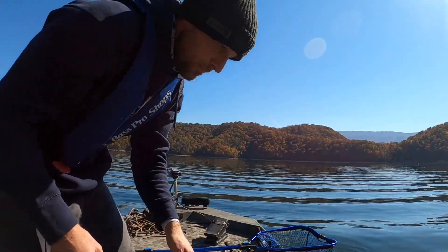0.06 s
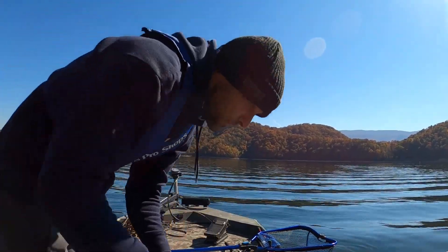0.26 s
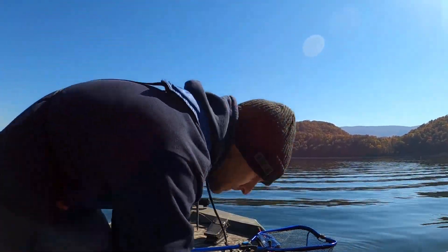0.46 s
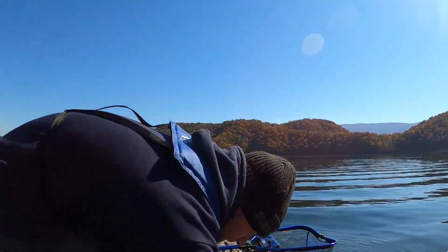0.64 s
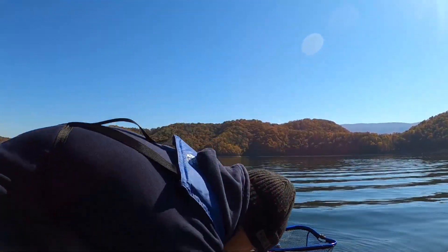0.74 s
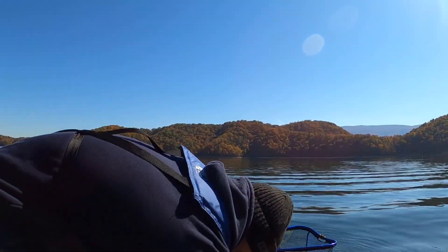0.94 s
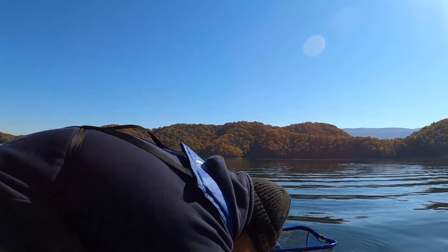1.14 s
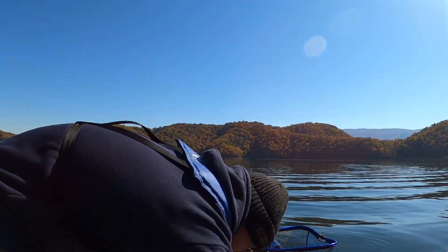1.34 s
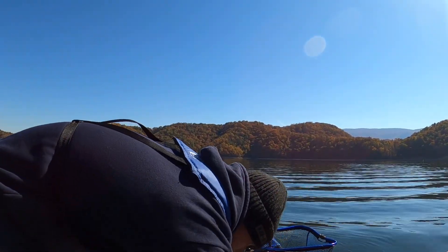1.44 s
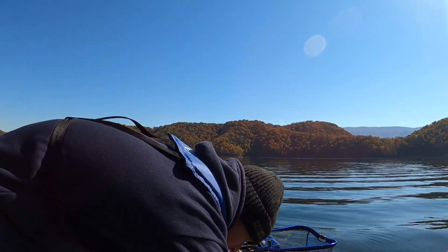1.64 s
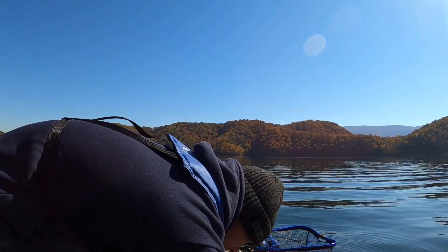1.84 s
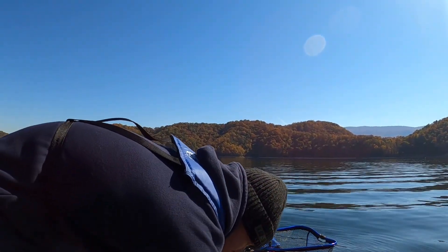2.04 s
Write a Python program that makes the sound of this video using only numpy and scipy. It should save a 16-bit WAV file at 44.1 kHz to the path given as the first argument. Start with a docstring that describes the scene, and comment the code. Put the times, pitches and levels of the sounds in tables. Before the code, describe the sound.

Hollow knocks and thumps on a small boat's deck, then fabric swishing three times.

```python
"""A faint rustle over a low hum and lapping water, then hard knocks and soft thumps boom in a hollow hull:
someone kneels on the deck of a small boat on a calm lake and moves gear about. Each blow sets the hull
ringing, and weight on a deck panel makes it swing at its own low pitch. Small tackle clicks, and ribbed
fabric swishes three times as the arms reach out, its ribs zipping as they slide. A far bird chirps thinly."""
import sys
import numpy as np
from scipy import signal
from scipy.fft import rfft, irfft, next_fast_len
from scipy.io import wavfile
from scipy.ndimage import map_coordinates

SR = 44100
rng = np.random.default_rng(int(sys.argv[2]) if len(sys.argv) > 2 else 0)


def bounce(signal):
    """Save signal as a 16-bit WAV file at the path given by the first command-line argument."""
    frames = np.transpose(np.atleast_2d(signal))
    limited = np.clip(frames, -1, 1)
    pcm = np.round(limited * 32767).astype(np.int16)
    wavfile.write(sys.argv[1], SR, pcm)


N = 92610


def amp(db):
    """Turns decibels into a gain to multiply by."""
    return 10 ** (np.asarray(db) / 20)


def unit(x):
    """Scales a sound to an average (rms) level of 1."""
    return x / np.sqrt(np.mean(x ** 2) + 1e-20)


def along(points, hz):
    """Reads a (frequency_hz, value) table between its rows, on a log frequency scale."""
    frequencies, values = np.transpose(points)
    return np.interp(np.log(hz + 1), np.log(frequencies + 1), values)


def curves(rows):
    """Turns each column after time_s into a curve with one value per sample."""
    times, *columns = np.transpose(rows)
    return [np.interp(np.arange(N) / SR, times, column) for column in columns]


def wobble(rate):
    """A smooth random curve through `rate` new values a second."""
    return map_coordinates(rng.standard_normal(int(N * rate / SR) + 4), [np.arange(N) * rate / SR])


def pan(db):
    """Left and right gains; above 0 dB the left is louder."""
    return amp(np.array([[db], [-db]]) / 2)


def fade(t, fade_s):
    """Dies away by 60 dB in fade_s seconds."""
    return np.exp(-np.log(1000) * t / fade_s)


def rise(t, rise_s):
    """Climbs from 0 towards 1, about two thirds of the way in rise_s seconds."""
    return 1 - np.exp(-t / rise_s)


def dulled(x, hz, order):
    """Softens the treble above hz; a higher order cuts more steeply."""
    return signal.lfilter(*signal.butter(order, min(hz, SR / 3), fs=SR), x)


def add(out, start_s, sound):
    """Mixes a sound in at its start time."""
    i = max(round(start_s * SR), 0)
    out[:, i:i + sound.shape[-1]] += sound[..., :N - i]


# How alike the two ears hear spread-out and close sounds: frequency_hz, likeness (1 = the same)
SPREAD = [(25, 0.85), (70, 0.82), (250, .97), (600, 0.81), (1500, 0.6), (4000, 0.12), (9000, 0.07)]
CLOSE = [(100, 0.97), (500, 0.96), (1500, 0.7), (4000, 0.48), (9000, 0.25)]

def noise(colour, likeness):
    """Stereo noise at level 1; its colour says how strong each frequency is against the others."""
    hz = np.fft.rfftfreq(N, 1 / SR)
    width = np.arccos(np.clip(along(likeness, hz), -1, 1)) / 2
    spectrum = rfft(rng.standard_normal((2, N))) * amp(along(colour, hz))
    mid, side = irfft(spectrum * [np.cos(width), np.sin(width)], N)
    return unit(np.array([mid + side, mid - side]))


# Colours of the soft wash and the high hiss: frequency_hz, strength_db
WASH_COLOUR = [(260, -18), (450, 2), (620, -3), (790, -5), (1080, 1), (1530, -3), (2030, -5), (3000, -9),
               (4700, -13.5), (6000, -20), (8000, -27.5), (12000, -42), (13900, -57.5)]
HISS_COLOUR = [(2500, -25.5), (5000, 4), (8000, -2), (10000, -6), (12500, -15), (14000, -24.5)]
# How each swells and sinks: time_s, level_db
WASH_LEVEL = [(0, -57), (.18, -60), (.5, -57), (.75, -57), (1.0, -57), (1.3, -59), (1.53, -60.5),
              (1.72, -54.5), (1.85, -58), (2.0, -58.5), (2.1, -55.5)]
HISS_LEVEL = [(0, -73.5), (.2, -71.5), (.36, -66.5), (.46, -77), (.6, -71), (.8, -71), (1.0, -74.5),
              (1.3, -88.5), (1.8, -89), (2.1, -98)]

def wash(boost_db=2):
    """A soft, fluttering wash of water and clothing, with a faint hiss that fades in the second half."""
    wash_db = curves(WASH_LEVEL)[0] + boost_db + wobble(38.56)
    hiss = amp(curves(HISS_LEVEL)[0]) * noise(HISS_COLOUR, SPREAD)
    return amp(wash_db) * noise(WASH_COLOUR, SPREAD) * pan(3.1) + hiss


def hum(pitch_hz=150, level_db=-48.5, drift=0.0052):
    """A low steady tone that wavers slightly in pitch and level."""
    pitch = pitch_hz * (1 + drift * wobble(4.9))
    return amp(level_db + wobble(15.04)) * np.sin(2 * np.pi * np.cumsum(pitch) / SR)


# Colour of the water under the boat: frequency_hz, strength_db
LAP_COLOUR = [(20, 3), (40, -4.5), (65, -3), (110, -2), (180, 2), (230, -7), (320, -2.5), (450, -19),
              (700, -41.5), (2000, -56)]
# How it swells and sinks: time_s, level_db
LAP_LEVEL = [(0, -50.5), (.15, -49.5), (.45, -45.5), (.8, -51), (1.0, -49), (1.14, -52), (1.22, -52),
             (1.31, -50.5), (1.4, -50), (1.55, -50), (1.74, -47), (1.82, -50), (1.95, -53), (2.1, -48.5)]

def lapping(swing_db=2.84):
    """Water laps at the hull: a low noise that swells unevenly."""
    return amp(curves(LAP_LEVEL)[0] + swing_db * wobble(12.41)) * noise(LAP_COLOUR, SPREAD)


# The bird's notes: start_s, level_db, top_pitch_hz
BIRD_NOTES = [(.123, -66.5, 4540), (0.15, -60.5, 4870), (.192, -62, 4830), (.423, -60, 4820),
              (0.468, -62.5, 4730), (0.835, -61, 4690), (.868, -61, 4710), (0.907, -57, 4790),
              (1.051, -70, 4650), (1.083, -58, 4860), (1.131, -57, 4900), (1.487, -63, 4640),
              (1.519, -60, 4830), (1.563, -61, 4730), (2.043, -66, 4670), (2.074, -58, 4800)]

def bird(note_s=0.031, fall_hz=387, waver_hz=60):
    """Thin falling notes from the shore, in twos and threes."""
    out, progress = np.zeros((2, N)), np.linspace(0, 1, int(note_s * SR))
    swell = np.sin(np.pi * progress) ** 2
    for start_s, level_db, top_pitch_hz in BIRD_NOTES:
        pitch = top_pitch_hz - fall_hz * progress ** 2 + waver_hz * wobble(700)[:len(progress)]
        add(out, start_s, amp(level_db) * swell * np.sin(2 * np.pi * np.cumsum(pitch) / SR))
    return out


# Moves of loose clothing: peak_s, level_db, half_length_s, brightness_hz
RUSTLES = [(0.022, -55.5, 0.016, 1500), (0.404, -51.5, .015, 12000), (1.692, -56.5, .015, 1210),
           (1.736, -48.5, 0.021, 990), (2.07, -58.5, 0.023, 3480)]
# Their colour: frequency_hz, strength_db
RUSTLE_COLOUR = [(150, -24.5), (600, -4.5), (1200, -0.5), (2500, -5), (5000, -3.5), (9000, -13),
                 (14000, -28.5)]

def rustles(grain_db=1.5):
    """Loose clothing shifts in brief, grainy swells of noise."""
    out, t = np.zeros((2, N)), np.arange(N) / SR
    for peak_s, level_db, half_length_s, brightness_hz in RUSTLES:
        swell = np.exp(-((t - peak_s) / half_length_s) ** 2)
        cloth = unit(dulled(noise(RUSTLE_COLOUR, SPREAD), brightness_hz, order=1))
        out += amp(level_db + grain_db * wobble(320)) * swell * cloth
    return out


# Three arm strokes, one list each: time_s, ribs_per_s, hiss_db, zip_db
ARM_STROKES = [
    [(1.115, 400, -58.5, -80), (1.15, 800, -45.5, -68), (1.195, 870, -41.5, -56), (1.225, 880, -45, -68),
     (1.265, 1300, -56, -75)],
    [(1.376, 360, -80, -83), (1.386, 700, -47, -58), (1.40, 970, -41, -61), (1.425, 760, -44.5, -48),
     (1.442, 736, -43, -37), (1.449, 550, -44.5, -46), (1.458, 550, -51, -32.5), (1.468, 470, -47.5, -54),
     (1.49, 300, -63, -68)],
    [(1.564, 363, -70, -68), (1.571, 420, -48.5, -51), (1.592, 670, -43, -45), (1.603, 990, -41, -33),
     (1.617, 1080, -41.5, -38), (1.635, 1160, -52.5, -36), (1.654, 525, -40, -36.5), (1.66, 300, -44, -38),
     (1.672, 200, -57, -75)],
]
# How strong the zip's overtones are, one value a stroke: overtones_db
STROKE_OVERTONES = [-1, -2, -5.5]
# Colours of those overtones through the cloth, and of the fibres' hiss: frequency_hz, strength_db
RIB_COLOUR = [(1000, 3), (2200, -2.5), (4800, 0), (6500, -11.5), (10000, -20)]
FIBRE_COLOUR = [(100, -9), (350, -5.5), (700, -1.5), (1300, -3.5), (2200, -8), (4200, -13.5), (6000, -21),
                (9000, -32.5), (13000, -44), (16000, -55)]

def swishes(grain_db=1.5, jitter=0.028, smear_radians=0.15, octave_db=-6.5, full_bright_hz=800):
    """Ribbed cloth slides: the fibres hiss and the ribs zip, higher and brighter as the arm speeds up."""
    out, t = np.zeros((2, N)), np.arange(N) / SR
    for stroke, overtones_db in zip(ARM_STROKES, STROKE_OVERTONES):
        ribs_per_s, hiss_db, zip_db = curves(stroke)
        phase = 2 * np.pi * np.cumsum(ribs_per_s * (1 + jitter * wobble(600))) / SR
        overtones = np.zeros(N)
        for k in range(2, 10):
            level_db = octave_db * np.log2(k / 2) + along(RIB_COLOUR, k * ribs_per_s)
            gain = amp(level_db + grain_db * wobble(200))
            overtones += gain * np.sin(k * (phase + smear_radians * wobble(350)))
        brightness = np.minimum(ribs_per_s / full_bright_hz, 1) ** 1.34
        ribs = amp(zip_db) * (np.sin(phase) + amp(overtones_db) * brightness * overtones)
        fibres = amp(hiss_db) * noise(FIBRE_COLOUR, CLOSE)
        sliding = (t > stroke[0][0]) & (t < stroke[-1][0])
        out += sliding * amp(grain_db * wobble(250)) * (ribs + fibres)
    return out


# Small tackle clicking: start_s, level_db, fade_s, pan_db
TACKLE_CLICKS = [(0.2185, -39.5, 0.053, 5), (0.5066, -37.5, 0.0093, 3), (0.546, -58, .015, -8),
                 (0.5592, -46, 0.082, 6), (0.6312, -35.5, 0.076, 5), (1.7697, -52, .03, 0),
                 (1.7892, -37, 0.047, 1.5)]
# Colour of a click: frequency_hz, strength_db
CLICK_COLOUR = [(200, -31), (700, -6.5), (1200, 0), (2100, 4), (2700, 2), (3600, 4.5), (4500, -1.5),
                (6000, -15.5), (8000, -21), (12000, -44.5)]

def clicks(rise_s=0.00041):
    """Light gear clacks: bright bursts of noise that die at once."""
    out, t = np.zeros((2, N)), np.arange(N) / SR
    for start_s, level_db, fade_s, pan_db in TACKLE_CLICKS:
        burst = noise(CLICK_COLOUR, CLOSE) * rise(t, rise_s) * fade(t, fade_s)
        add(out, start_s, amp(level_db) * pan(pan_db) * burst)
    return out


# Weight landing on the deck: start_s, level_db, pitch_hz, rise_s, fade_s
DECK_THUMPS = [(.2198, -8, 195.6, 0.0029, 0.077), (.243, -21, 155, 0.0042, 0.18),
               (0.285, -15.5, 76.2, 0.0089, 0.3), (0.2964, -13.5, 141.1, 0.0092, 0.28),
               (.368, -2.5, 89, 0.015, 0.045), (0.376, -27.5, 182.2, 0.0041, .2),
               (0.439, -38.5, 72.2, 0.026, 1), (0.5619, -16, 108.5, 0.0028, 0.35),
               (0.5593, -26.5, 273, 0.0012, 0.095), (0.6366, -18.5, 166.4, 0.0019, 0.15),
               (0.633, -18, 111.9, 0.0024, 0.2), (.686, -21, 95.4, 0.005, 0.12),
               (0.692, -26.5, 163, 0.0054, 0.24), (0.801, -23.5, 137.4, 0.013, 0.13),
               (1.331, -35, 105, 0.0042, 0.19), (1.737, -35.5, 114, 0.0044, 0.063),
               (1.823, -41, 86.7, .01, 0.43)]

def thumps():
    """The deck panel that takes the weight swings over the hollow hull and booms at its own pitch."""
    out, t = np.zeros((2, N)), np.arange(SR) / SR
    for start_s, level_db, pitch_hz, rise_s, fade_s in DECK_THUMPS:
        boom = rise(t, rise_s) * fade(t, fade_s) * np.sin(2 * np.pi * pitch_hz * t)
        add(out, start_s, amp(level_db) * boom)
    return out


# Hard blows on the hull: start_s, level_db, brightness_hz, ring_db, length_factor (scales the fades)
HULL_KNOCKS = [(0.2184, -33.5, 4160, 0.5, 0.94), (0.2632, -44, 2200, 4, .3), (0.2899, -41, 2000, -16, 0.41),
               (.336, -40.5, 1140, -8.5, .22), (.5572, -39, 1260, -1.5, 1.0), (0.6314, -41, 1900, -6, 1)]
# The hull's clear ringing tones: pitch_hz, tone_db, fade_s
HULL_TONES = [(259, -9, 0.11), (351.3, -4.5, 0.33), (471.4, 0, 0.11), (572, -12, 0.29), (672, -12, 0.27),
              (1107, -10.5, 0.15), (1280, -11, 0.15), (1480, -12, 0.15), (1750, -18.5, 0.18),
              (1873, -7.5, 0.063), (2475, -10, 0.036), (3080, -21, 0.12)]
# The panels' many tones, so crowded that they sound like noise: frequency_hz, strength_db
PANEL_COLOUR = [(40, -18), (90, 9.5), (250, 3), (500, -6), (800, -9.5), (1300, -4.5), (2600, -17),
                (4500, -28.5), (8000, -19), (14000, -28)]
# How long the panels ring: frequency_hz, fade_s
PANEL_FADES = [(100, 0.72), (300, 0.45), (1000, 0.21), (2500, 0.14), (8000, 0.13)]

def knocks(hull_db=8.5, panels_db=11.5, vary_db=1.8, rise_s=0.0005):
    """Each blow rings the hull and its panels; a softer contact is duller, a rattle dies sooner."""
    out, t = np.zeros((2, N)), np.arange(SR // 2) / SR
    for start_s, level_db, brightness_hz, ring_db, length_factor in HULL_KNOCKS:
        ring = np.zeros(len(t))
        for k, (pitch_hz, tone_db, fade_s) in enumerate(HULL_TONES):
            gain = amp(tone_db + rng.normal(0, vary_db)) * (-1) ** k  # neighbours start opposite ways
            ring += gain * fade(t, length_factor * fade_s) * np.sin(2 * np.pi * pitch_hz * t)
        # Split the panel noise into bands so that the high ones die first.
        hz, age_s, bands = signal.stft(noise(PANEL_COLOUR, CLOSE)[:, :len(t)], SR, nperseg=256)
        bands *= fade(age_s, length_factor * along(PANEL_FADES, hz)[:, None])
        panels = signal.istft(bands, SR)[1][:, :len(t)]
        blow = (amp(hull_db + ring_db) * ring + amp(panels_db) * panels) * rise(t, rise_s)
        add(out, start_s, amp(level_db) * dulled(blow, brightness_hz, order=3))
    return out


# Which side the knocks and clothing lean to: frequency_hz, pan_db (above 0 is left)
NEAR_PAN = [(100, 0.5), (500, 1.8), (2000, 2), (4000, 2.5), (8000, -2.5), (12000, -3)]

def placed(x):
    """Leans each frequency a little to the left or right."""
    size = next_fast_len(N + SR // 4)
    lean_db = along(NEAR_PAN, np.fft.rfftfreq(size, 1 / SR)) / 2
    return irfft(rfft(x, size) * amp([lean_db, -lean_db]), size)[:, :N]


def scene():
    """Everything on and around the boat, mixed in stereo."""
    low_sounds = (hum() + lapping() + thumps()) * pan(1.12)
    return wash() + bird() + low_sounds + clicks() + placed(rustles() + swishes() + knocks())


def record(dry, top_hz=14100):
    """Cuts away the very highest treble, above top_hz."""
    size = next_fast_len(N + SR // 4)
    kept = np.fft.rfftfreq(size, 1 / SR) < top_hz
    return irfft(rfft(dry, size) * kept, size)[:, :N]


dry = scene()
out = record(dry)
bounce(out)
```